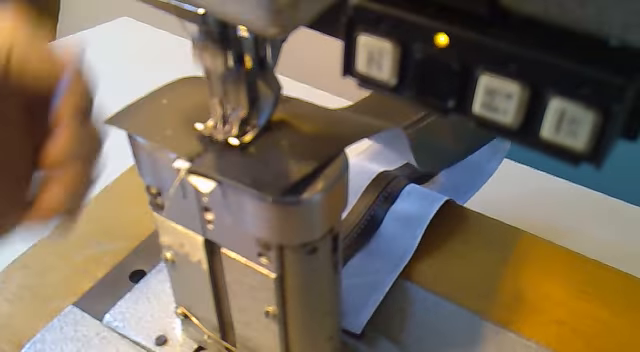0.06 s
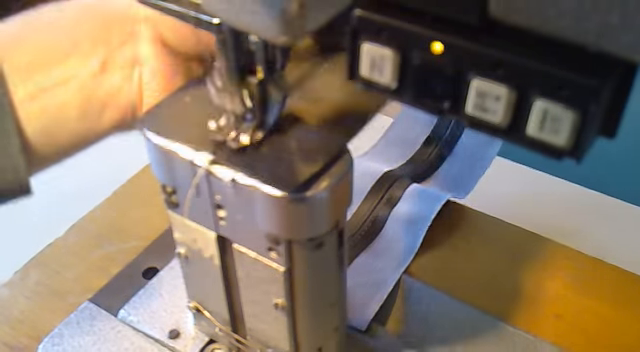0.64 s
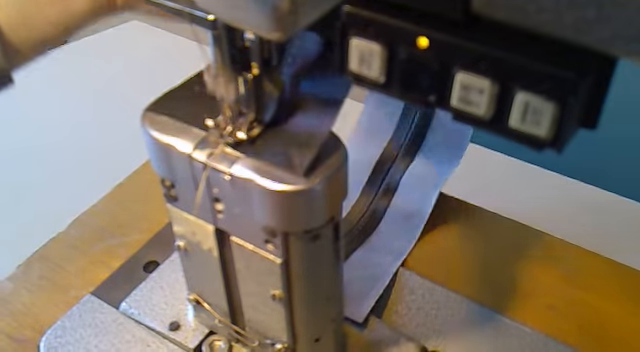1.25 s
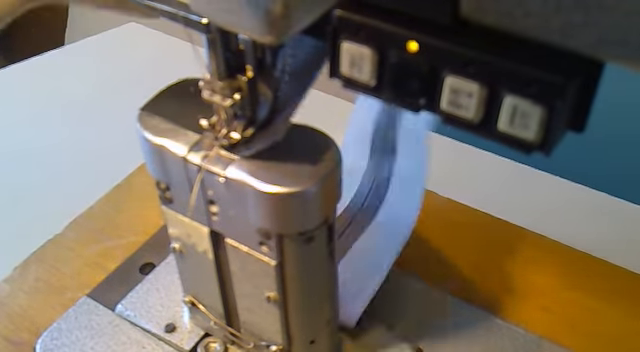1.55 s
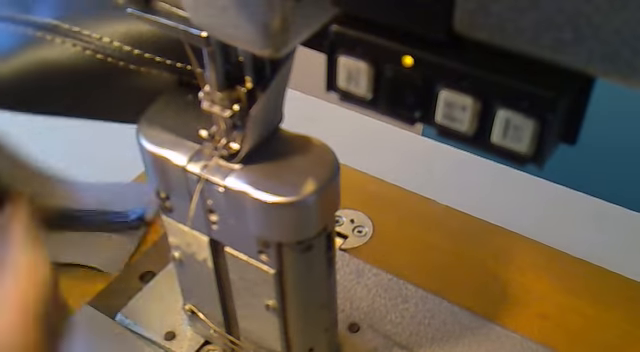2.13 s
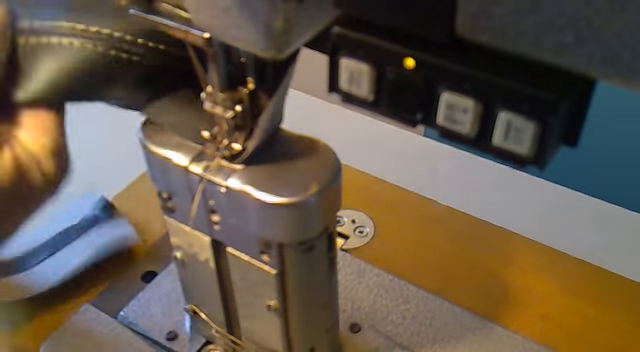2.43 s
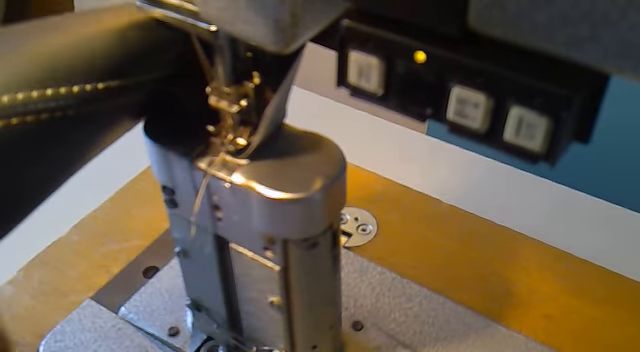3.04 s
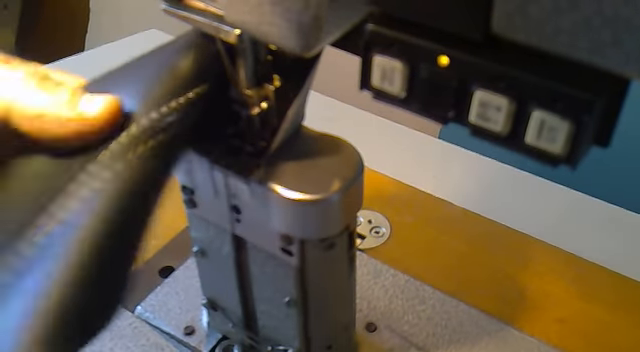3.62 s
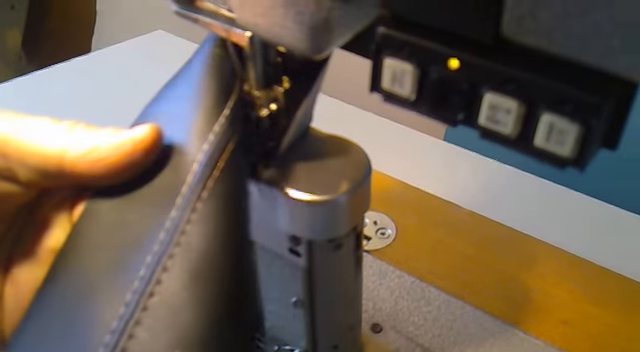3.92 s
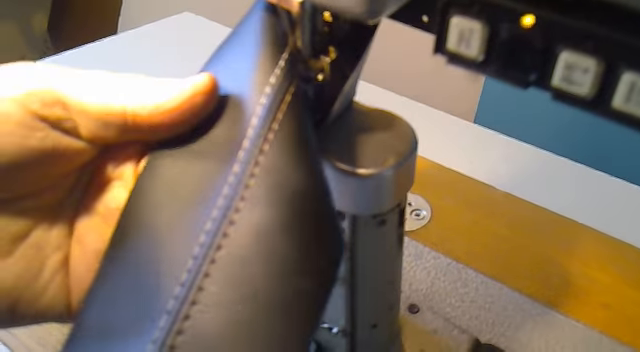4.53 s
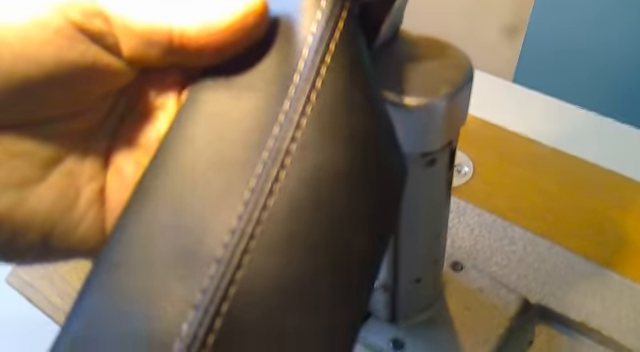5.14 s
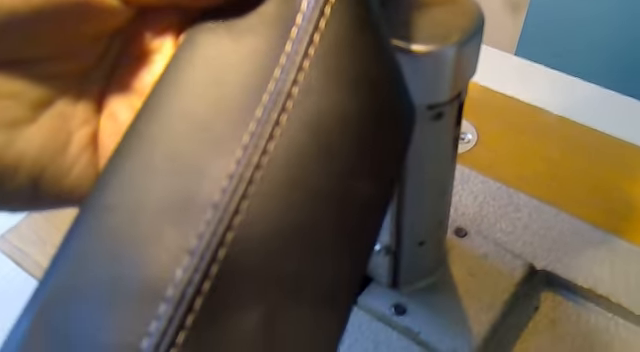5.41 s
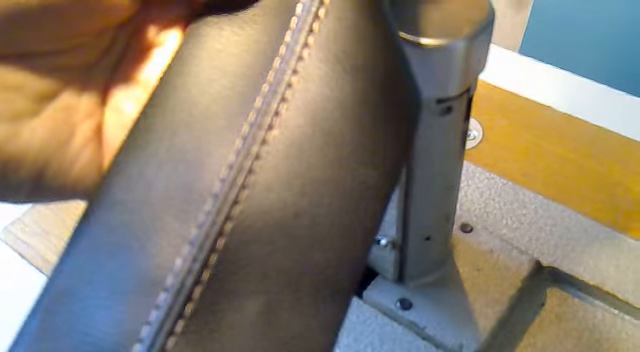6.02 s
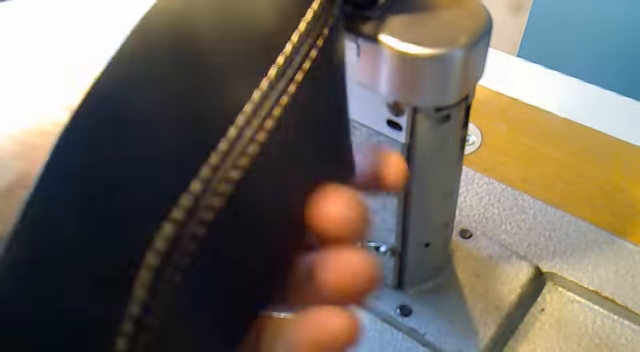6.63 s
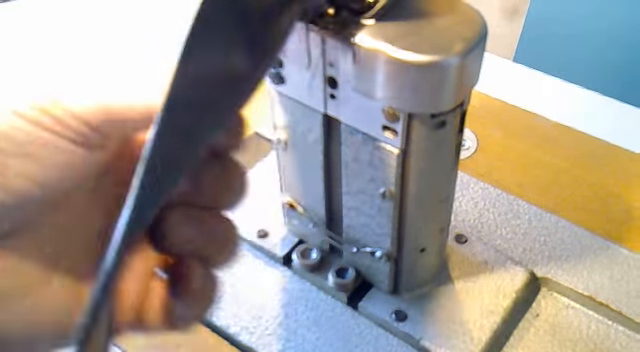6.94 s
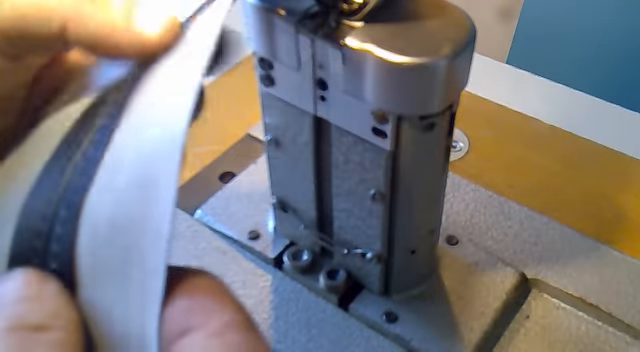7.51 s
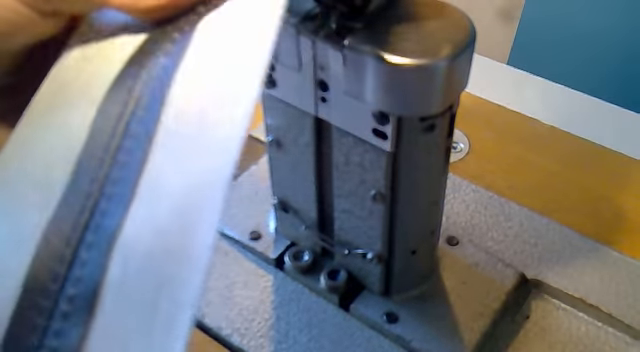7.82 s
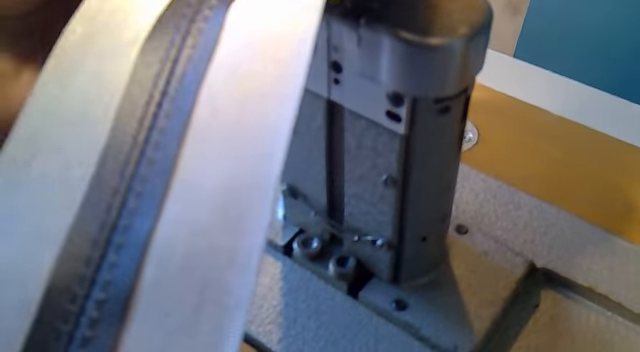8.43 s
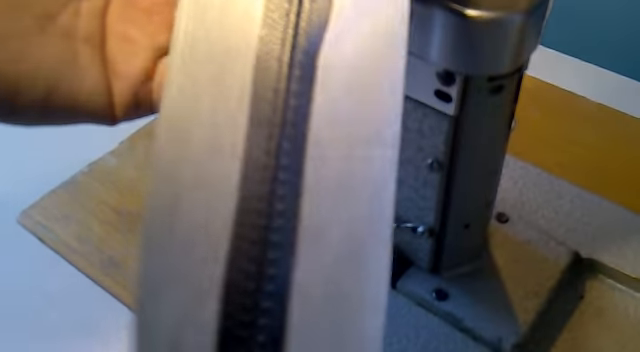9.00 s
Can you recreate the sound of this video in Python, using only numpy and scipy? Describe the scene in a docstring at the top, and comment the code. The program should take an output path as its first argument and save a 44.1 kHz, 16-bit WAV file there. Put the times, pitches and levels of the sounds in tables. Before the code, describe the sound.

An industrial sewing machine clatters in two short bursts, then leather rustles and creaks softly as it is handled in a small workshop.

```python
"""Industrial post-bed sewing machine stitching leather: two short bursts, close by, in a small workshop.
The walking foot knocks, needle bar and linkages clack, gears and feed rattle. All ring the cast frame;
the moving masses shake table and stand. Then the piece is pulled out and turned by hand: leather
sticks and slips in tiny grains, creaks and crackles, with one sharp tick. A steady hush lies beneath."""
import sys
import numpy as np
from scipy import signal
from scipy.fft import rfft, irfft, next_fast_len
from scipy.io import wavfile
from scipy.ndimage import uniform_filter1d

SR = 44100
rng = np.random.default_rng(int(sys.argv[2]) if len(sys.argv) > 2 else 0)


def wrap_up_sound(samples):
    """Save the sound to the file named by the first command line argument, as 16-bit audio."""
    columns = np.atleast_2d(samples).T
    # keep every value between -1 and 1, then stretch to whole-number steps
    tamed = np.clip(columns, -1, 1)
    steps = np.round(tamed * 32767).astype(np.int16)
    wavfile.write(sys.argv[1], SR, steps)


N = 408366

# spectra: f/Hz, level/dB
AIR_SPECTRUM = [(12, -35.5), (20, -11), (27, -13.5), (53, -15), (158, -22.5), (270, -13.5), (513, -17),
                (642, -15.5), (738, -17), (1190, -16.5), (2320, -19.5), (3160, -22.5), (3840, -25.5),
                (13900, -25), (16000, -21.5)]
RUB_SPECTRUM = [(120, -20), (260, -7), (450, -10), (700, -3.5), (900, -6.5), (1300, -1.5), (1650, -2.5),
                (2100, -3.5), (2800, -9), (4200, -16.5), (5500, -25.5), (16000, -64.5)]
SKID_SPECTRUM = [(900, -28.5), (1600, -4.5), (2000, 1), (2300, 0), (2550, -4), (2850, -10), (3500, -33),
                 (5000, -38), (16000, -37.5)]
NAP_SPECTRUM = [(1500, -26.5), (3000, 0), (4400, -1.5), (5500, -9), (7000, -6.5), (9200, -1), (11500, -3.5),
                (16000, -11.5)]
SLIP_SPECTRUM = [(200, -44), (700, -22), (1300, 1.5), (1800, 2.5), (2300, -2), (3000, -15), (5000, -19),
                 (16000, -66)]
CREASE_SPECTRUM = [(120, -38), (350, -16), (700, -1.5), (950, -9), (1600, 4), (2200, 1.5), (3000, -10),
                   (4300, -13), (6000, -25.5), (10000, -17), (16000, -35)]
HISS_SPECTRUM = [(3000, -24), (5000, -0.5), (9500, -3), (12500, 1.5), (16000, -0.5)]
GEAR_SPECTRUM = [(250, -36.5), (450, 0.5), (700, 6.5), (880, 0.5), (1080, 5), (1300, -4), (1700, -10),
                 (3000, -38)]
FEED_SPECTRUM = [(700, -27.5), (1300, -5.5), (1700, 2), (2300, -2), (2700, -6.5), (3250, -4.5), (3700, -7),
                 (4150, -8.5), (4800, -16.5), (7000, -23.5), (9500, -16), (12500, -24.5), (16000, -31.5)]
CLACK_SPECTRUM = [(70, -43), (160, -21.5), (300, -8), (480, -8), (700, -0.5), (1150, -5), (2050, 2),
                  (2650, 0), (3200, -2), (4600, -19.5), (7000, -24), (9800, -15.5), (12500, -30.5),
                  (16000, -38.5)]
KNOCK_SPECTRUM = [(70, -40.5), (160, -22), (300, -19), (480, -15.5), (700, -0.5), (1150, -5), (2050, 6),
                  (2700, -6.5), (3300, -3), (4600, -15), (7000, -19.5), (9500, -15.5), (12500, -28.5),
                  (16000, -32.5)]

# resonances: f/Hz, width/Hz, level/dB
SEAM_MODES = [(3430, 650, -7), (4070, 390, -5)]
LINING_MODES = [(1270, 150, 0.5), (1550, 200, -15.5)]
SQUEAK_MODES = [(2250, 170, -4), (2370, 170, 2.5)]
STAND_MODES = [(95.5, 31, -8), (123, 12, 1.5), (158, 7.1, -9)]
TABLE_MODES = [(220, 24, -5.5), (245, 32, -3), (291, 13, 4.5), (351, 22, -20)]
GRIND_MODES = [(1653, 210, -3), (1850, 110, -9.5)]
FRAME_MODES = [(303, 8, 9.5), (427, 20, 5.5), (559, 24, 1), (682, 20, -12), (777, 40, -5), (825, 23, 1),
               (1098, 17, -11), (1287, 92, 2), (1724, 22, -4), (1820, 14, -9), (2160, 78, -4.5),
               (2330, 100, 1), (3110, 40, -9), (3336, 54, -4.5), (3400, 16, -10.5), (4260, 50, -0.5),
               (5614, 35, -10.5)]
TICK_MODES = [(780, -9, 0.012), (1390, 1.5, 0.005), (2120, 2.5, 0.0021), (4300, -11, 0.0011),
              (7200, -19, 0.0033)]  # ring of the tick: f/Hz, level/dB, t60/s

# decay of reflections in the workshop and among the machine's parts: f/Hz, t60/s
ROOM_DECAY = [(150, 0.26), (700, 0.83), (2500, 0.29), (10000, 0.27)]
CASING_DECAY = [(150, .02), (900, 0.088), (3000, 0.03), (6000, 0.08), (12000, 0.011)]

# leather through the hands: start/s, end/s, fade/s, relative level/dB, lightness/dB, nap hiss/dB
HAND_STROKES = [(1.565, 1.938, .02, -66, -0.5, -73), (1.66, 1.696, .008, -71, -5, -67),
                (1.785, 1.86, 0.015, -63, 1, -81), (1.967, 2.04, 0.012, -64.5, 5, -67),
                (2.05, 2.095, .007, -67, -5, -71), (2.076, 2.47, 0.02, -73.5, -1, -80),
                (2.487, 2.593, 0.011, -59, 3.5, -63.5), (2.585, 2.97, 0.018, -67, 2.5, -77),
                (2.804, 2.87, .01, -65.5, 5, -69.5), (2.963, 3.265, .022, -64.5, 0.5, -70),
                (3.067, 3.137, .01, -61.5, 1, -78), (3.29, 3.55, .03, -71.5, -4.5, -79),
                (3.536, 3.742, 0.022, -61, 0, -68.5), (3.72, 3.926, .015, -64.5, 3, -69),
                (3.946, 4.02, 0.016, -57.5, -.5, -65.5), (4.028, 4.192, 0.031, -64.5, 0.5, -70),
                (4.183, 4.55, .05, -78.5, -5, -84), (6.273, 6.36, .015, -76, -2, -77),
                (6.416, 6.52, .018, -73.5, 4, -76), (6.684, 6.8, .025, -77, 8.5, -85),
                (6.786, 7.08, .02, -71, 1.5, -77), (7.19, 7.25, .02, -77, 9, -86.5),
                (7.552, 7.647, 0.016, -75, 10, -72), (7.8, 7.953, 0.019, -73.5, 0, -76.5),
                (7.98, 8.228, 0.035, -73.5, 3, -79), (8.46, 8.743, 0.023, -73, 4, -73),
                (8.77, 9.1, .025, -79.5, 2.5, -82)]
CREAKS = [(1.787, 1.845, 145, -50.5), (2.492, 2.582, 98, -53), (3.573, 3.627, 130, -53),
          (3.946, 3.993, 140, -45.5), (6.786, 6.832, 77, -58), (6.908, 6.938, 140, -59),
          (7.763, 7.798, 266, -54)]  # taut leather: start/s, end/s, slip rate/Hz, typical peak/dB
# creases snapping, fingers tapping: t/s, relative level/dB, body/dB, hardness/dB
CREASE_SNAPS = [(1.8259, -52, -14, -9), (1.9828, -56.5, 3, 12), (2.0155, -61, -3, 5), (2.538, -59, -2, 13),
                (2.5662, -54, -8, -3), (2.6596, -58, -3, 5), (3.9918, -56, 7, -2), (4.0151, -52.5, 0, -3),
                (4.3452, -60.5, 3, -3), (4.6147, -61.5, 4, -7.5), (5.031, -65, 6.5, -3),
                (6.8813, -55.5, -2, -11.5), (6.9241, -57.5, -1, -2), (6.9499, -66, -10, 13),
                (6.9896, -62.5, -5, 10), (7.0305, -55, -8, 5.5), (7.414, -60, 1, 4), (7.6317, -65, 10, -2),
                (7.6495, -64.5, 11, 0), (7.7703, -50.5, -3, 0), (8.1885, -61.5, 3, -5), (8.419, -58, 6, 9),
                (8.4718, -59, 15.5, 11), (8.7466, -61, 10, 2), (8.886, -63, 3, -8), (8.9077, -65, 11, 3.5),
                (8.9395, -63.5, 6, -5), (9.0255, -61, 5, 4), (9.0753, -58, 9, -3)]

# narrow-band friction: start/s, end/s, level/dB
SEAM_RASPS = [(1.975, 2.0, -64), (3.99, 4.18, -67)]
LINING_DRAGS = [(8.21, 8.27, -71), (8.64, 8.8, -68.5), (8.86, 9.1, -74.5)]
FINGER_SQUEAKS = [(1.66, 1.76, -62.5), (1.79, 1.845, -52.5), (6.79, 6.83, -60), (8.12, 8.2, -71)]
FEED_GRINDS = [(0.21, 0.305, -46), (1.05, 1.135, -40)]

EFFORT = [(0, 7), (.07, -7.5), (.125, -3.5), (.165, -10), (.26, -9), (.35, -2.5), (.40, -19), (.54, -27),
          (.56, -0.5), (.655, -8.5), (.84, 3.5), (1.0, -8.5), (1.13, 0.5), (1.24, -8.5), (1.35, 4.5),
          (1.485, -0.5), (1.525, -11), (1.6, -29.5)]  # how hard the machine works: t/s, level/dB
STAND_BOOMS = [
    [(0.01, -47.5), (0.058, -60), (0.162, -64), (0.222, -73), (0.29, -76), (0.316, -63), (0.356, -62.5),
     (0.48, -88), (0.53, -82), (0.54, -76)],
    [(0.54, -73), (0.56, -61.5), (0.732, -67), (0.854, -52.5), (1.056, -74), (1.162, -53.5), (1.308, -70),
     (1.326, -64), (1.464, -65), (1.64, -91)],
]  # low boom, one curve per burst: t/s, level/dB
TABLE_THUMPS = [(0.116, -39.5), (0.78, -41), (0.931, -38.5), (1.285, -43.5), (1.378, -32.5)]  # occasional low table thumps: t/s, peak/dB
# impacts: t/s, relative level/dB, body/dB, hardness/dB, swell/s
LINKAGE_CLACKS = [(0.0308, -36.5, 6.5, 12, .0017), (0.0953, -43, 10, 6.5, .0016),
                  (0.1115, -32.5, -3.5, 2.5, 0.0029), (0.1734, -42.5, 1, -0.5, .0035),
                  (0.1824, -35, -10, 5.5, .0016), (0.2177, -45, -9, -1.5, 0.0013),
                  (0.2317, -41, -1, -2, 0.0017), (0.2438, -33.5, -3, 0, .0023), (0.2692, -48, -3, 0, .0016),
                  (0.2934, -39, -4, 1.5, .0016), (0.3165, -42.5, 14.5, 16.5, 0.0012),
                  (0.3357, -34.5, 0, -11, .0014), (0.3491, -36.5, 7.5, 2.5, 0.0021),
                  (0.4149, -54, 8.5, -5, 0.0013), (0.5795, -30.5, -1.5, 1.5, 0.0029),
                  (0.6016, -47.5, 1.5, -6, 0.0018), (0.6176, -39, 3.5, 7, .0016),
                  (0.6762, -38.5, 2.5, -3.5, 0.0019), (0.6862, -31.5, 2, 4, .0018),
                  (0.7254, -41.5, -4, 0, 0.0012), (0.7338, -29.5, -13.5, 3.5, 0.0014),
                  (0.7678, -25.5, -2.5, -3.5, 0.0014), (0.7981, -29.5, -2.5, 1.5, 0.0018),
                  (0.8091, -36.5, -3, -5.5, .003), (0.8209, -33.5, 7, 2, .0016),
                  (0.8444, -31.5, -2, 2.5, 0.0024), (0.871, -31.5, -12.5, 7.5, 0.0024),
                  (0.9168, -26, 6, 9, 0.0014), (0.9655, -30, 4.5, 8.5, 0.0025),
                  (1.0122, -42, -2, 3.5, 0.0019), (1.0224, -33.5, 4, 9.5, 0.0014),
                  (1.0603, -33, 2.5, 0, .0016), (1.1115, -34.5, -6, -3, 0.0015),
                  (1.1226, -38, 10.5, 1, 0.0015), (1.1505, -36, 4.5, -2, 0.0014),
                  (1.178, -32, -8.5, 6, 0.0032), (1.2031, -43, 7.5, 9.5, 0.0017),
                  (1.2612, -32.5, 0, 6, 0.0021), (1.3211, -31.5, 1, 2.5, 0.0014),
                  (1.335, -28.5, 1.5, 2, 0.0013), (1.3626, -29, -1.5, -6.5, 0.0017),
                  (1.4064, -36.5, -14, -1, .0016), (1.424, -35, -22, -10, .0016),
                  (1.4364, -43.5, -1.5, 10, 0.002), (1.472, -35, 0, -9.5, 0.0016),
                  (1.486, -36.5, -3, 1, 0.0017)]
FOOT_KNOCKS = [(0.0016, -30, 2, -5, .0022), (0.55, -24.5, 0, 0, .0018), (0.7789, -27.5, 1.5, 1.5, .0016),
               (0.9277, -23.5, 0.5, -5.5, .0015), (1.073, -27.5, -6, 2, .0018),
               (1.3245, -26.5, 3.5, 1, .0015), (1.3769, -25.5, -18, 0.5, .0019)]


def amp(db):
    """Decibels to gain."""
    return 10 ** (np.asarray(db) / 20)


def unit(x):
    """Scale to rms 1."""
    return x / np.sqrt(np.mean(x ** 2) + 1e-20)


def along(points, hz):
    """Interpolate (f/Hz, value) points on a log axis."""
    freqs, values = np.transpose(points)
    return np.interp(np.log(hz + 1), np.log(freqs + 1), values)


def add(track, t_s, sound):
    """Mix sound into track at t_s."""
    part = track[max(round(t_s * SR), 0):][:len(sound)]
    part += sound[:len(part)]


def curve_gain(points):
    """Gain per sample from (t/s, level/dB) points; zero outside them."""
    times, db = np.transpose(points)
    first, last = np.clip([round(times[0] * SR), round(times[-1] * SR)], 0, N)
    return np.pad(amp(np.interp(np.arange(first, last) / SR, times, db)), (first, N - last))


def stroke_gain(rows, release_ratio=1.36):
    """Gain per sample from (start/s, end/s, fade/s, level/dB) rows; release slower than attack."""
    t = np.arange(0, N, 64) / SR
    step = lambda t_s, fade_s: (1 + np.tanh((t - t_s) / fade_s / 2)) / 2
    power = sum((amp(db) * step(start, fade) * (1 - step(end, release_ratio * fade))) ** 2
                for start, end, fade, db in rows)
    return np.interp(np.arange(N) / SR, t, np.sqrt(power))


def filtered(x, response):
    """Apply a frequency response."""
    size = next_fast_len(len(x) + SR // 2)
    return irfft(rfft(x, size) * response(np.fft.rfftfreq(size, 1 / SR)), size)[:len(x)]


def coloured(x, spectrum):
    """Shape by (f/Hz, level/dB) points; rms 1."""
    return unit(filtered(x, lambda hz: amp(along(spectrum, hz))))


def patchy(x, depth_db):
    """Shifting contact points favour different resonances from moment to moment; rms 1."""
    z = signal.stft(x, nperseg=256)[2]
    field = uniform_filter1d(rng.standard_normal(z.shape), size=3, axis=0)
    field = uniform_filter1d(field, size=6, axis=1)
    return unit(signal.istft(z * amp(depth_db * unit(field)), nperseg=256)[1][:N])


def ringing(hz, t60_s):
    """One decaying mode."""
    t = np.arange(SR // 2) / SR
    return np.sin(2 * np.pi * hz * t) * amp(-60 * t / t60_s)


def resonate(x, modes):
    """Drive a bank of damped resonances."""
    t = np.arange(SR // 3) / SR
    response = sum(amp(db) * 2 * np.pi * width / SR * np.exp(-np.pi * width * t)
                   * np.cos(2 * np.pi * hz * t) for hz, width, db in modes)
    response[0] /= 2
    return signal.oaconvolve(x, response)[:N]


def echoes(decay, size=SR // 2):
    """Diffuse tail with frequency-dependent t60; energy 1."""
    hz, t, z = signal.stft(rng.standard_normal(size), SR, nperseg=128)
    tail = signal.istft(z * amp(-60 * t / along(decay, hz)[:, None]), SR, nperseg=128)[1]
    return tail / np.linalg.norm(tail)


def room(x, wet_db, delay_s=.004):
    """Add workshop reverberation."""
    tail = np.pad(echoes(ROOM_DECAY), (round(delay_s * SR), 0))
    return x + amp(wet_db) * signal.fftconvolve(x, tail)[:N]


def pulse(spectrum, body_db=0, hardness_db=0, size=2048):
    """Minimum-phase click. Body lifts the lows; hardness the 3 kHz clink and the treble."""
    hz = np.fft.rfftfreq(size, 1 / SR)
    clink_db, treble_db = 1.15 * hardness_db, 1.09 * hardness_db
    lift = [(1150, body_db), (1600, 0), (2650, 0), (3000, clink_db), (3550, clink_db),
            (4200, 0), (5500, treble_db)]
    cepstrum = irfft(np.log(amp(along(spectrum, hz) + along(lift, hz))))
    cepstrum[1:size // 2] *= 2
    cepstrum[size // 2 + 1:] = 0
    return irfft(np.exp(rfft(cepstrum)))


def grains(rate_hz, spread_db=0):
    """Tiny contacts at random times; rms 1."""
    chance, size = rng.random(N), rng.uniform(-1, 1, N)
    hits = np.flatnonzero(chance < rate_hz / SR)
    track = np.zeros(N)
    track[hits] = np.sign(size[hits]) * amp(spread_db * np.sqrt(12) * np.abs(size[hits]))
    return unit(track)


def chatter(swell_s, size=2048):
    """Burst of micro-contacts that swells and dies; energy 1."""
    age = np.arange(size) / SR / swell_s
    envelope = age * np.exp(-age)
    z = rfft(rng.standard_normal(size) * envelope)
    burst = irfft(z / (np.abs(z) + 1e-12)) * envelope
    return burst / np.linalg.norm(burst)


def contacts(rows, spectrum, blow, scatter_db, rms_window_s=.007):
    """Impacts: chatter, a clean blow at its peak, close reflections."""
    track = np.zeros(N)
    for t_s, db, body_db, hardness_db, swell_s in rows:
        force = chatter(swell_s, size=4096)
        force[round(swell_s * SR)] += blow
        add(force, swell_s, amp(scatter_db) * echoes(CASING_DECAY, size=4096))
        hit = signal.fftconvolve(force, pulse(spectrum, body_db, hardness_db))
        add(track, t_s, amp(db) * hit * np.sqrt(rms_window_s * SR / np.sum(hit ** 2)))
    return track


def stray_taps(spectrum, swell_s, rate_hz, spread_db):
    """Small impacts at random times; rms 1."""
    hits = grains(rate_hz, spread_db)
    tap = signal.fftconvolve(chatter(swell_s), pulse(spectrum))
    return unit(signal.oaconvolve(hits, tap)[:N])


def friction_note(rows, modes, fade_s=.011, rate_hz=1500, spread_db=2):
    """Slides whose grains excite narrow resonances."""
    gain = stroke_gain([(start, end, fade_s, db) for start, end, db in rows])
    return gain * unit(resonate(grains(rate_hz, spread_db), modes))


def workshop_air():
    """Steady hush."""
    return amp(-67.5) * coloured(rng.standard_normal(N), AIR_SPECTRUM)


def tick(t_s=5.3793, peak_db=-31.5, highpass_hz=550):
    """Sharp tick: neighbouring modes start in antiphase; so small a source radiates no bass."""
    track = np.zeros(N)
    click = sum((-1) ** k * amp(db) * ringing(hz, t60) for k, (hz, db, t60) in enumerate(TICK_MODES))
    click = signal.sosfilt(signal.butter(2, highpass_hz, "highpass", fs=SR, output="sos"), click)
    add(track, t_s, amp(peak_db) * click / np.abs(click).max())
    return room(track, wet_db=-20)


def creaks(jitter=.17, spread_db=1.27):
    """Taut leather lets go in uneven trains of short, damped slips."""
    track, slip = np.zeros(N), pulse(SLIP_SPECTRUM)
    for start, end, rate_hz, db in CREAKS:
        gaps, sizes = rng.standard_normal((2, 40))
        times = start + np.cumsum(np.exp(jitter * gaps) / rate_hz) - 1 / rate_hz
        for t_s, size in zip(times[times < end], sizes):
            add(track, t_s, amp(db + spread_db * size) * slip / np.abs(slip).max())
    return track


def creases(rub_gain, swell_s=.0015):
    """Small creases crackle during each stroke; single snaps and finger taps stand out."""
    crackle = amp(-6) * rub_gain * stray_taps(CREASE_SPECTRUM, swell_s, rate_hz=22, spread_db=6.5)
    snaps = [(*row, swell_s) for row in CREASE_SNAPS]
    return crackle + amp(-1) * contacts(snaps, CREASE_SPECTRUM, blow=.06, scatter_db=-3)


def leather():
    """Stick-slip: a firm touch rubs, a light one skids; seam rasps, lining drags, fingers squeak."""
    rub_gain = stroke_gain([(*timing, db - light) for *timing, db, light, _ in HAND_STROKES])
    skid_gain = stroke_gain([(*timing, db + light) for *timing, db, light, _ in HAND_STROKES])
    nap_gain = stroke_gain([(*timing, nap_db) for *timing, _, _, nap_db in HAND_STROKES])
    rub = amp(-.5) * rub_gain * patchy(coloured(grains(1300), RUB_SPECTRUM), depth_db=1.5)
    skid = amp(-2) * skid_gain * patchy(coloured(grains(1200, .5), SKID_SPECTRUM), depth_db=1.5)
    nap = amp(1) * nap_gain * coloured(grains(9000, 3), NAP_SPECTRUM)
    rasp = friction_note(SEAM_RASPS, SEAM_MODES)
    drag = friction_note(LINING_DRAGS, LINING_MODES)
    squeak = friction_note(FINGER_SQUEAKS, SQUEAK_MODES)
    return room(rub + skid + nap + rasp + drag + squeak + creases(rub_gain) + creaks(), wet_db=-9.5)


def agitation(shake_db=33.5, t60_s=.21):
    """Motion of the machine's parts: running effort plus a dying shake after each knock."""
    shake, t = np.zeros(N), np.arange(SR // 2) / SR
    for t_s, db, body_db, *_ in FOOT_KNOCKS:
        add(shake, t_s, amp(shake_db + db + body_db - 60 * t / t60_s))
    return np.hypot(curve_gain(EFFORT), shake)


def stand_boom():
    """The moving masses shake the stand's low modes."""
    gain = sum(curve_gain(burst) for burst in STAND_BOOMS)
    spectrum = [(40, -2.5), (75, -3.5), (100, -3.5), (160, -2), (300, -16)]
    return gain * coloured(resonate(grains(320), STAND_MODES), spectrum)


def table_drum(motion, lag_s=.007, thump_hz=305.4, t60_s=.081):
    """The heavy table follows the motion late; occasional low thumps ring near 305 Hz."""
    t = np.arange(N) / SR
    sway = np.interp(t - lag_s, t, motion, left=0) ** .76
    spectrum = [(90, -27), (200, -3), (350, 2), (900, -19.5)]
    track = amp(-51.5) * sway * coloured(resonate(grains(550, 8), TABLE_MODES), spectrum)
    for t_s, db in TABLE_THUMPS:
        add(track, t_s, amp(db) * ringing(thump_hz, t60_s))
    return track


def drive_rattle(motion):
    """Loose parts tap with the effort; gears and feed rattle with the motion."""
    taps = stray_taps(CLACK_SPECTRUM, swell_s=.0025, rate_hz=34, spread_db=1)
    loose = amp(-53) * curve_gain(EFFORT) * taps
    gears = amp(-48) * motion * coloured(grains(950, 5), GEAR_SPECTRUM)
    feed = amp(-47) * motion * patchy(coloured(grains(2500, 1.5), FEED_SPECTRUM), depth_db=4)
    return loose + gears + feed


def sewing_machine():
    """The foot strikes, needle bar and linkages take up play; these and the drive ring the frame."""
    knocks = amp(1.5) * contacts(FOOT_KNOCKS, KNOCK_SPECTRUM, blow=.78, scatter_db=-1)
    clacks = amp(-1.5) * contacts(LINKAGE_CLACKS, CLACK_SPECTRUM, blow=0, scatter_db=.5)
    motion = agitation()
    metal = knocks + clacks + drive_rattle(motion)
    frame = amp(-1.5) * resonate(metal, FRAME_MODES)
    rumble = stand_boom() + table_drum(motion)
    hiss = amp(-60) * motion ** .55 * coloured(rng.standard_normal(N), HISS_SPECTRUM)
    grind = friction_note(FEED_GRINDS, GRIND_MODES, fade_s=.005, rate_hz=1000, spread_db=6)
    return room(metal + frame + grind, wet_db=-19.5) + rumble + hiss


def scene():
    """Machine and handling over the workshop hush; mono."""
    return (sewing_machine() + leather() + tick() + workshop_air())[None]


def record(dry):
    """Brick-wall low-pass and a tiny DC offset."""
    cutoff_hz, offset = 15850, -.0005
    return filtered(dry[0], lambda hz: hz < cutoff_hz)[None] + offset


dry = scene()
out = record(dry)
wrap_up_sound(out)
```